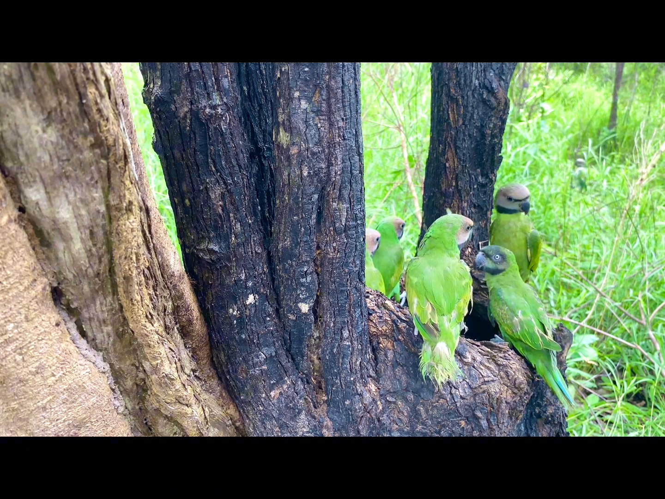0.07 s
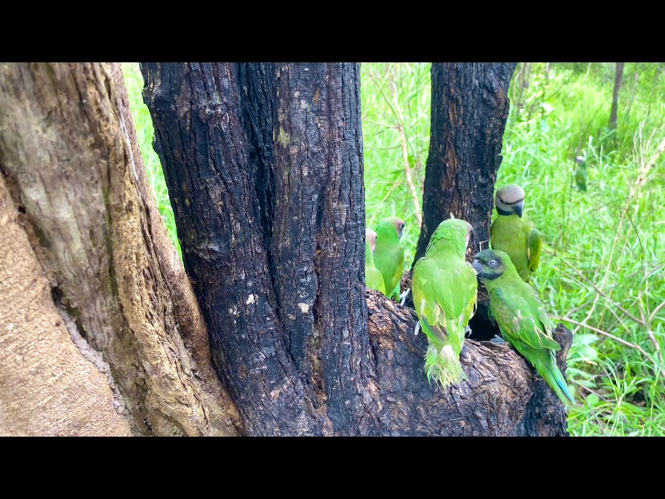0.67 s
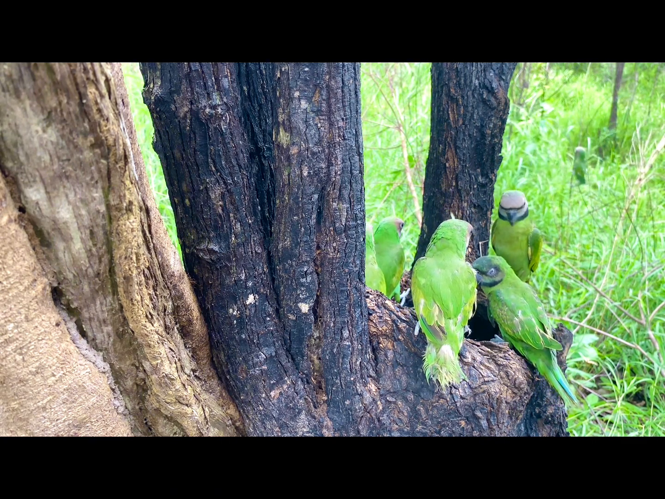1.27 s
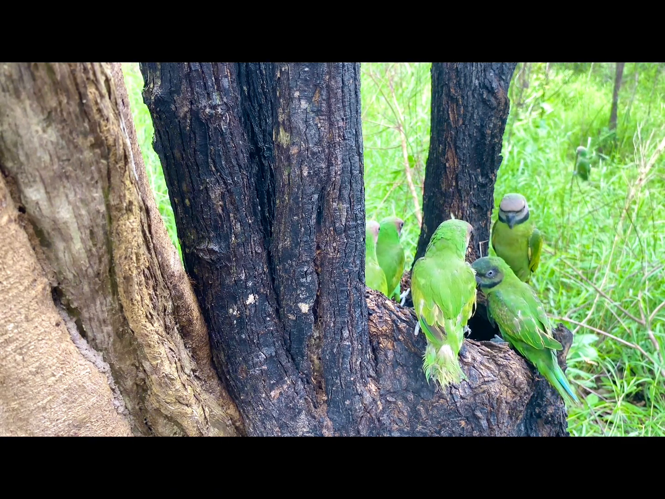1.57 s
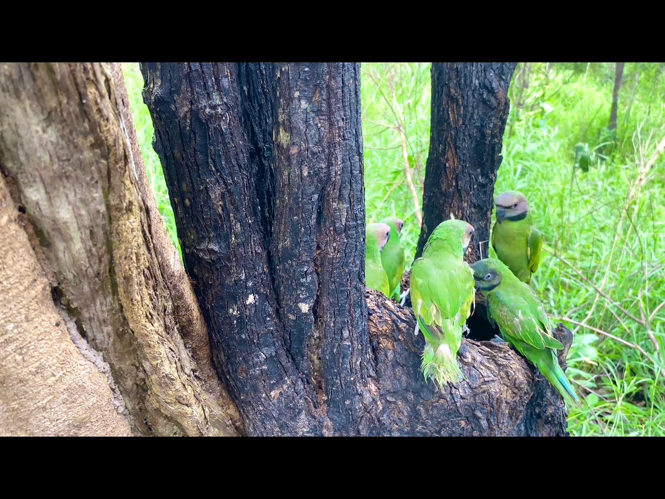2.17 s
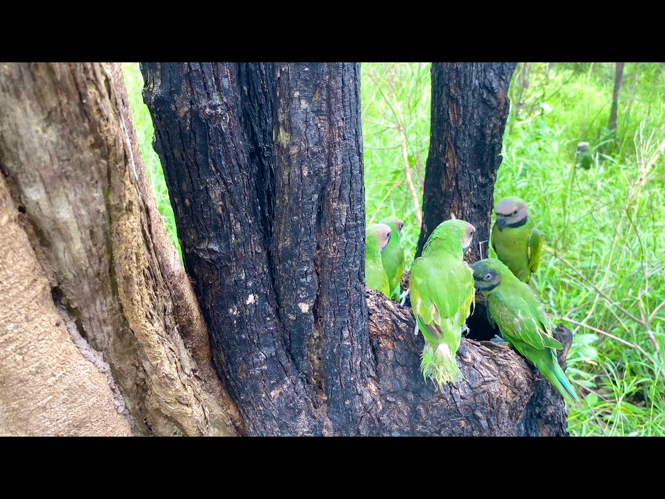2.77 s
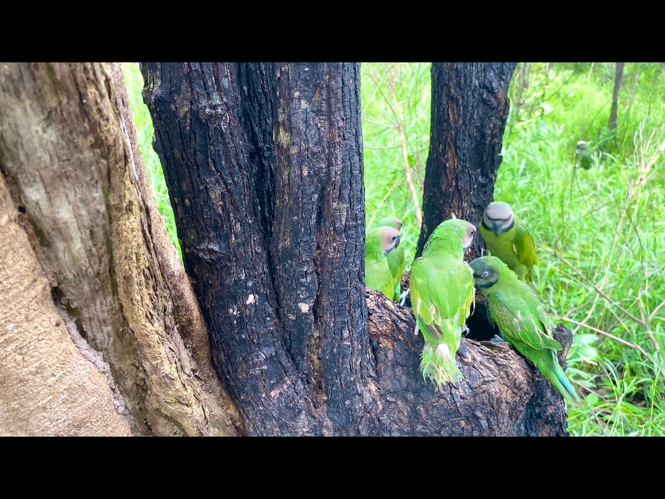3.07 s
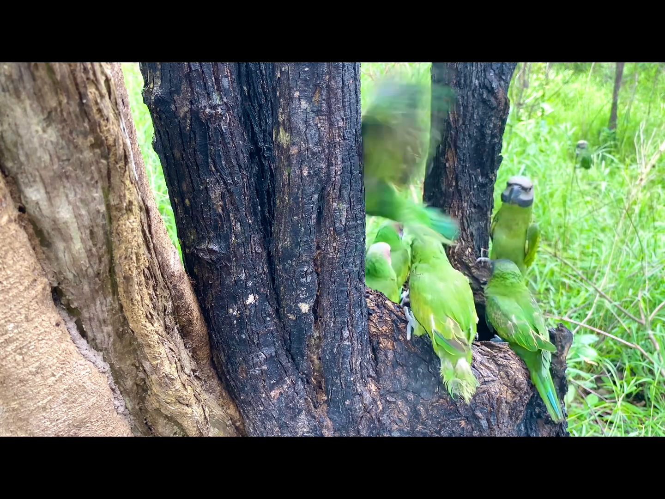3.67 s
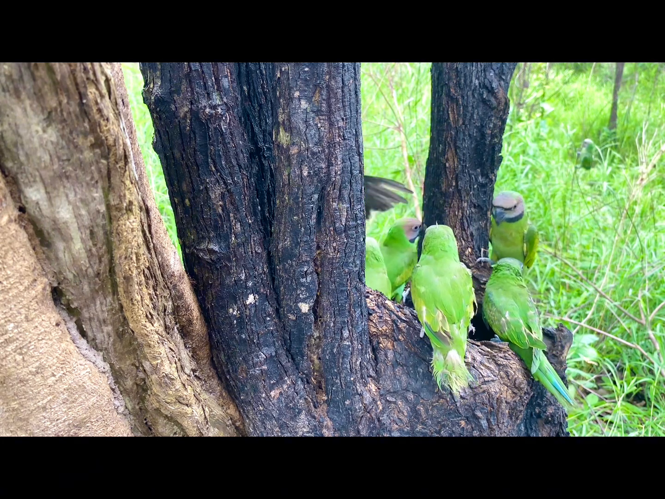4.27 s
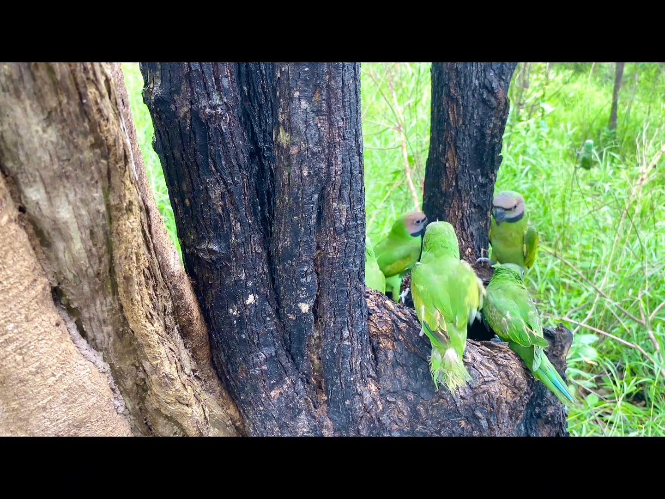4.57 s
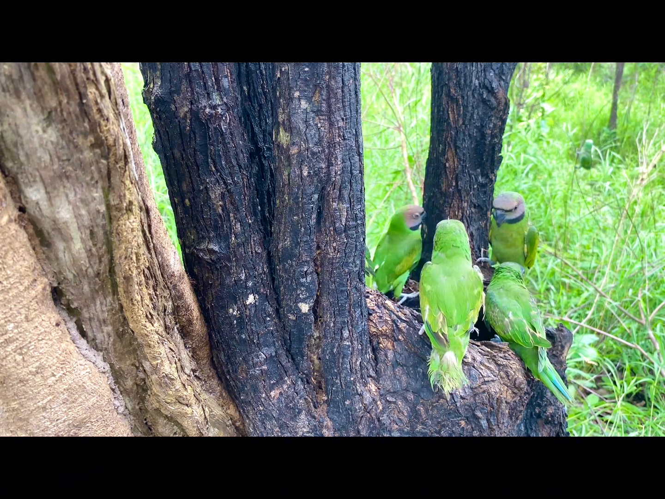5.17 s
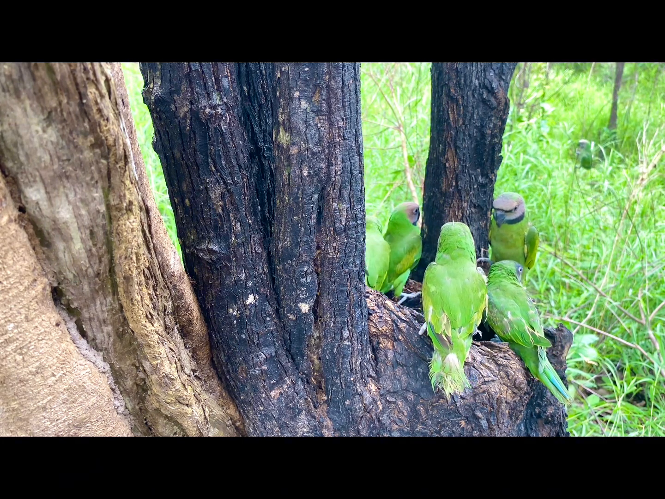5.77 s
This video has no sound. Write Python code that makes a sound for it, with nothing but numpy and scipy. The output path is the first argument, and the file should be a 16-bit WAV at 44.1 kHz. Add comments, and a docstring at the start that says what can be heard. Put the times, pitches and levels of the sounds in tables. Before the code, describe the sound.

Quiet woodland hisses faintly throughout, with a light breeze rumbling on the microphone. A soft parakeet rasp opens, and a distant dove coos faintly until about 2.3 seconds. A small bird gives thin, rising whistles far off near 0.7, 1.9 and 4.8 seconds. At 1.3 seconds a close parakeet gives one short, harsh, piercing screech, by far the loudest sound, with a slight echo from the trees. Claws scrape lightly on bark between 2 and 2.5 seconds. From 3.3 to 3.8 seconds a bird flies close past with about eight quick, clapping, rustling wingbeats and puffs of air. A soft creaky rasp follows at 4.3 seconds, then scattered thin claw ticks. Around 5 seconds a muffled, stuttering churr slides into a wavering, falling whine. A tiny low bird note at 5.5 seconds and a few faint rasps finish by 6 seconds.

```python
"""In quiet woodland, parakeets crowd round a nest hollow. Light air stirs, a dove coos and a small bird
whistles far off. One parakeet screeches close by, claws scratch the bark, another flies in past the
microphone with clapping wings, and soft rasps and a churr follow. The parakeets' voices are source and
filter: pulses from the syrinx excite resonances of windpipe and beak. Wings, claws and wind are
shaped noise, and the trees scatter the nearer sounds."""
import sys
import numpy as np
from scipy import signal
from scipy.fft import rfft, irfft, next_fast_len
from scipy.io import wavfile
from scipy.ndimage import uniform_filter1d, map_coordinates

SR = 44100
rng = np.random.default_rng(int(sys.argv[2]) if len(sys.argv) > 2 else 0)


def int16_out(signal):
    """Quantize to a 16-bit WAV file."""
    q = np.round(np.clip(np.atleast_2d(signal).T, -1, 1) * 32767)
    wavfile.write(sys.argv[1], SR, q.astype(np.int16))


N = 264644
HZ, TIME = np.fft.rfftfreq(N, 1 / SR), np.arange(N) / SR
BAND_LIMIT_HZ = 15950


def amp(db):
    """Amplitude ratio of a level in decibels."""
    return 10 ** (np.asarray(db) / 20)


def unit(x):
    """Normalisation to unit rms."""
    return x / np.sqrt(np.mean(x ** 2) + 1e-20)


def spectrum(points, hz=HZ):
    """Interpolation on a log-frequency axis."""
    f, value = np.transpose(points)
    return np.interp(np.log(hz + 1), np.log(f + 1), value)


def follow(curve, t):
    """Linear interpolation of each column at times t."""
    s, *columns = np.transpose(curve)
    return [np.interp(t, s, c) for c in columns]


def add(mix, s, sound):
    """Superposition of a sound starting at s seconds."""
    part = mix[..., max(round(s * SR), 0):][..., :sound.shape[-1]]
    part += sound[..., :part.shape[-1]]


def wobble(size, rate_hz):
    """Smooth random modulation of unit rms."""
    knots = np.arange(size) * rate_hz / SR
    return unit(map_coordinates(rng.standard_normal(2048), [knots], order=2, mode="wrap"))


def swell(t, middle, length):
    """Raised-cosine envelope of height one."""
    return np.cos(np.pi * np.clip((t - middle) / length, -.5, .5)) ** 2


def stroke(length):
    """Critically damped pulse, peaking at a third of length."""
    u = np.arange(int(4 * length * SR)) / (length * SR / 3)
    return u * np.exp(1 - u)


def resonate(x, modes):
    """Minimum-phase resonances, each a frequency in Hz, bandwidth in Hz and gain in dB."""
    size = next_fast_len(len(x) + 2048)
    f = abs(np.fft.fftfreq(size, 1 / SR))
    gain = sum(amp(db) / (1 + (2 * (f - hz) / width) ** 2) for hz, width, db in modes)
    gain = gain / (1 + (modes[0][0] / 2 / (f + 1)) ** 4) + 1e-5  # bass roll-off
    response = np.exp(np.conj(signal.hilbert(np.log(gain))))
    return np.fft.ifft(np.fft.fft(x, size) * response).real[:len(x)]


def stereo(x, lag_s=0, turn_rad=0):
    """Direction as phase difference: the left channel is delayed, and turned below the top treble."""
    phase = 2 * np.pi * HZ * lag_s + turn_rad / (1 + (HZ / 11500) ** 16)
    return np.array([irfft(rfft(x) * np.exp(-1j * phase), N), x])


# Likeness of the channels. Each row: frequency in Hz, correlation.
COHERENCE = [(40, 0.2975), (130, 0.46), (290, 0.8), (700, 0.15), (3000, 0.16), (7000, 0.11), (9300, 0.67),
             (16000, 0.71)]

def noise(colour):
    """Partially coherent stereo noise of unit rms."""
    left, independent = rfft(rng.standard_normal((2, N)))
    same = spectrum(COHERENCE)
    right = same * left + np.sqrt(1 - same ** 2) * independent
    return unit(irfft(np.array([left, right]) * amp(spectrum(colour)), N))


# Background spectrum. Each row: frequency in Hz, relative density in dB.
WOOD_SPECTRUM = [(25, -29), (70, -19), (120, -2.5), (184, -13.5), (300, -5.5), (400, -9), (900, -9.5),
                 (2500, -17), (5300, -19), (9200, -28), (12300, -29), (15000, -45.5), (16000, -61.5)]

def woodland(level_db=-55, flutter_db=0.93):
    """Leaves and distant sounds sum to nearly steady noise."""
    return amp(level_db + flutter_db * wobble(N, 25)) * noise(WOOD_SPECTRUM)


# Light breeze. Each row: time in seconds, level in dB.
BREEZE = [(0, -70), (.85, -63), (1.55, -69), (1.75, -57), (2.9, -54), (3.3, -53), (4.0, -57.5), (6, -52.5)]
# Gusts. Each row: centre and duration in seconds, level in dB.
GUSTS = [(0.171, 0.042, -48), (0.369, 0.25, -48.5), (3.325, 0.034, -43.5), (4.42, 0.41, -56),
         (4.916, 0.074, -49), (5.238, 0.27, -49.5), (5.856, 0.17, -52)]
# Wind and its deeper buffeting. Each row: frequency in Hz, relative density in dB.
WIND_SPECTRUM = [(15, -23), (30, -19), (60, 1), (95, 0), (160, -10.5), (300, -21), (700, -56)]
BUFFET_SPECTRUM = [(15, -5), (45, 1), (75, -4.5), (130, -28), (400, -55)]

def wind(lumps_db=2):
    """Turbulent pressure on the microphone: the stronger the flow, the greater its share of deep bass."""
    breeze_db, = follow(BREEZE, TIME)
    breeze = amp(breeze_db) * unit(amp(lumps_db * wobble(N, 14)))
    breeze += sum(amp(db) * swell(TIME, s, length) for s, length, db in GUSTS)
    flow = np.hypot(breeze, wing_wake())  # powers add
    buffet = flow * np.sqrt(flow / flow.max()) * noise(BUFFET_SPECTRUM)
    return flow * noise(WIND_SPECTRUM) + buffet


def far_note(hz, waver=0.016, fading_db=3):
    """Amplitude fading: a nearly pure tone comes and goes through the leaves."""
    cycles = np.cumsum(hz * (1 + waver * wobble(len(hz), hz[0] / 20))) / SR
    fading = amp(fading_db * wobble(len(hz), hz[0] / 40))
    return unit(fading * np.sin(2 * np.pi * cycles) * signal.windows.tukey(len(hz), .6))


# Coos. Each row: start and duration in seconds, level in dB, mid-note pitch in Hz.
COOS = [(0.033, 0.091, -72, 320), (0.336, 0.19, -59.5, 326), (0.678, 0.18, -60, 318), (1, 0.21, -62, 311),
        (1.715, 0.153, -64, 292), (2.077, 0.25, -64, 302)]

def dove(sag=0.114):
    """Parabolic frequency glide: each distant coo sags in the middle."""
    out = np.zeros(N)
    for s, length, db, hz in COOS:
        u = np.linspace(-1, 1, int(length * SR))
        add(out, s, amp(db) * far_note(hz * (1 + sag * u ** 2)))
    return stereo(out)


# Creaking rasps. Each row: start and duration in seconds, level in dB, pulse rate in Hz,
# low resonance and its bandwidth in Hz, high resonance in Hz, its gain in dB.
RASPS = [(0.037, 0.35, -58, 87, 1260, 500, 2600, -2.5), (4.288, 0.33, -59, 153, 1340, 259, 1890, -13.5),
         (5.584, 0.034, -52, 130, 823, 870, 2800, -10), (5.628, 0.214, -56, 70, 515, 500, 1460, -10),
         (5.802, 0.081, -61, 76, 600, 504, 2300, -5)]

def rasps(high_width_hz=1200, unevenness=0.14, breathiness=0.28):
    """Pulsed excitation: slow, uneven puffs ring two throat resonances."""
    out = np.zeros(N)
    for s, length, db, rate, low_hz, width_hz, high_hz, high_db in RASPS:
        size = int(length * SR)
        cycles = np.cumsum(rate * (1 + unevenness * wobble(size, 60))) / SR
        puffs = (breathiness + np.exp(-(cycles % 1) / .22)) * rng.standard_normal(size)
        note = resonate(puffs, [(low_hz, width_hz, 0), (high_hz, high_width_hz, high_db)])
        add(out, s, amp(db) * unit(note) * signal.windows.tukey(size, .2))
    return stereo(out, lag_s=-0.00036)


# Whistles. Each row: start and duration in seconds, level in dB, first and last pitch in Hz.
WHISTLES = [(.66, .135, -67, 3800, 5500), (1.86, .12, -65, 3950, 5600), (4.81, .07, -69, 4100, 5400)]

def small_bird():
    """Linear frequency sweep: each distant whistle climbs."""
    out = np.zeros(N)
    for s, length, db, first_hz, last_hz in WHISTLES:
        add(out, s, amp(db) * far_note(np.linspace(first_hz, last_hz, int(length * SR))))
    return stereo(out)


def syrinx(hz, rough, jitter=0.07, doubling=0.49):
    """Membrane oscillation: roughness brings jitter, period doubling and puffs of noise."""
    cycles = np.cumsum(hz * (1 + jitter * rough * wobble(len(hz), 900))) / SR
    pulses = unit(sum(np.cos(2 * np.pi * k * cycles) * (k * hz < BAND_LIMIT_HZ) for k in range(1, 24)))
    pulses *= 1 + doubling * rough * np.cos(np.pi * cycles)
    puffs = unit((1 + np.cos(2 * np.pi * cycles)) * rng.standard_normal(len(hz)))
    return (1 - rough) * pulses + rough * puffs


# Contours of the screech. Each row: time in seconds, then respectively open-throat pitch in Hz,
# effort in dB, or roughness from 0 to 1.
SCREECH_PITCH = [(1.333, 600), (1.345, 690), (1.365, 967), (1.38, 971), (1.436, 962), (1.45, 950),
                 (1.473, 1030), (1.483, 970), (1.494, 700)]
SCREECH_EFFORT = [(1.333, -45), (1.341, -26.5), (1.352, -17.3), (1.361, -17.8), (1.367, -11.8),
                  (1.392, -15.8), (1.416, -16), (1.432, -18.3), (1.483, -21.3), (1.494, -48)]
SCREECH_ROUGHNESS = [(1.333, .6), (1.36, .45), (1.367, .05), (1.42, .06), (1.432, .48), (1.452, .3),
                     (1.465, .52), (1.494, .65)]
# Throat constrictions. Each row: centre and duration in seconds, depth from 0 to 1.
PINCHES = [(1.345, .045, .8), (1.398, .016, .75), (1.417, .022, 1), (1.436, .03, .55), (1.451, .024, .9),
           (1.47, .03, .4)]
# Resonances of windpipe and beak. Each row: frequency and bandwidth in Hz, gain in dB.
OPEN_THROAT = [(980, 1100, -23.5), (1910, 740, -19), (3060, 860, -14.5), (3960, 680, -4), (4890, 460, 1),
               (7930, 400, -19.5), (8660, 400, -11.5), (9930, 980, -25), (12300, 1900, -32),
               (15760, 1100, -40)]
PINCHED_THROAT = [(1066, 170, -24.5), (1370, 178, 0.5), (1933, 570, -0.5), (2666, 370, -18.5),
                  (3630, 200, 1.5), (4700, 250, -30), (5350, 470, -4), (6443, 210, -3), (6970, 400, -11.5),
                  (8240, 500, -17.5), (9670, 400, -21), (10200, 484, -19), (12300, 1500, -31),
                  (15400, 470, -39.5)]
BEAK_HISS = [(4500, 4000, 3), (10320, 3500, -3), (15400, 1500, -18)]
# Stereo balance. Each row: frequency in Hz, left minus right in dB.
SCREECH_BALANCE = [(900, 0.5), (1900, 3), (2800, -2.5), (3750, -3), (4800, 3.5), (5700, 7.5), (6500, 5),
                   (10000, 1.5)]

def screech(fundamental_db=-11.5, hiss_db=-25, tremble=0.00068, pinch_drop=0.044):
    """Source and filter: a note, harsh at both ends, flips register as the throat pinches."""
    start, end = SCREECH_PITCH[0][0], SCREECH_PITCH[-1][0]
    t = np.arange(start, end, 1 / SR)
    hz, = follow(SCREECH_PITCH, t)
    effort_db, = follow(SCREECH_EFFORT, t)
    rough, = follow(SCREECH_ROUGHNESS, t)
    pinch = np.minimum(sum(depth * swell(t, s, length) for s, length, depth in PINCHES), 1)
    hz = hz * (1 - pinch_drop * pinch) * (1 + tremble * wobble(len(t), 400))
    drive = syrinx(hz, rough)
    voice = resonate(drive * (1 - pinch), OPEN_THROAT) + resonate(drive * pinch, PINCHED_THROAT)
    voice /= np.sqrt(abs(uniform_filter1d(voice ** 2, size=300)) + 1e-12)  # both registers equally loud
    # the membranes' basic swing keeps its pitch even when the overtones break up
    fundamental = np.sin(2 * np.pi * np.cumsum(hz) / SR)
    fundamental *= 1 + rough * (1 + 1.4 * wobble(len(t), 304))
    hiss = unit(resonate(rng.standard_normal(len(t)), BEAK_HISS)) * (.5 + rough + pinch)
    voice += amp(fundamental_db) * fundamental + amp(hiss_db) * hiss
    out = np.zeros(N)
    add(out, start, voice * amp(effort_db) * signal.windows.tukey(len(t), .02))
    balance = amp(np.outer([.5, -.5], spectrum(SCREECH_BALANCE)))
    return irfft(rfft(stereo(out, turn_rad=1.0)) * balance, N)


# Claw contacts. Each row: start in seconds, level in dB.
SCRAPES = [(1.961, -51.5), (1.988, -55.5), (2.004, -62), (2.113, -54), (2.422, -53.5), (2.448, -52.5),
           (2.471, -54.5)]
TICKS = [(4.6069, -59), (4.7107, -54.5), (4.772, -56), (5.4095, -49), (5.437, -54), (5.46, -56),
         (5.5124, -54), (5.5383, -57), (5.8312, -46)]

def claws(scrape_s=0.017, tick_s=0.0037):
    """Friction and impact on bark give gritty scrapes and thin ticks."""
    scrapes, ticks = np.zeros(N), np.zeros(N)
    for s, db in SCRAPES:
        add(scrapes, s, amp(db) * stroke(scrape_s))
    for s, db in TICKS:
        add(ticks, s, amp(db) * stroke(tick_s))
    grit = noise([(1000, -14.5), (2800, 1), (7500, 0), (10000, -14), (16000, -21)])
    snap = noise([(2000, -11), (6000, -3), (11000, 7), (16000, -3.5)])
    return scrapes * grit + ticks * snap


def nearness_db(t, arrive_s=3.392, leave_s=3.6, rise_db_per_s=113, fall_db_per_s=48):
    """Level falls with distance: the flying bird relative to its closest moment."""
    return -rise_db_per_s * np.maximum(arrive_s - t, 0) - fall_db_per_s * np.maximum(t - leave_s, 0)


# Wingbeats. Each row: start and duration in seconds, feather and thump levels in dB,
# thump frequency in Hz, wake level in dB.
WINGBEATS = [(3.302, .015, -46, -58, 500, -58), (3.346, 0.013, -43.5, -42.5, 1100, -53),
             (3.385, .012, -33, -36, 840, -28), (3.473, 0.013, -39.5, -34, 740, -40.5),
             (3.552, .016, -30.5, -31.5, 260, -44), (3.623, .013, -28, -29.5, 604, -53),
             (3.686, 0.0093, -44.5, -34, 470, -60), (3.778, 0.016, -33, -54, 476, -56)]
# Wing-tip snaps. Each row: start and duration in seconds, level in dB.
TIP_SNAPS = [(3.487, 0.0037, -30.5), (3.568, .008, -34.5), (3.761, .005, -43)]
# Feather rattle and air rushing through feathers. Each row: frequency in Hz, relative density in dB.
RATTLE_SPECTRUM = [(300, 6.5), (900, 1.5), (2000, 1), (3500, -3.5), (7000, -5.5), (11000, -4), (16000, -12)]
RUSH_SPECTRUM = [(88, -36), (150, -13), (716, -20), (998, -29.5), (1360, -20), (1760, -27), (7320, -35.5),
                 (9260, -40), (11000, -31), (16000, -41)]

def wings(rush_db=-44.5, grain_db=2, upstroke_db=-45, upstroke_lag_s=0.057, upstroke_hz=674):
    """Air displacement: each beat and its upstroke shove a puff of air and rattle the stiff feathers."""
    rattle, thumps = np.zeros(N), np.zeros(N)
    strokes = [beat[:-1] for beat in WINGBEATS]
    for beat_s, *_ in WINGBEATS:
        s = beat_s + upstroke_lag_s
        db = upstroke_db + nearness_db(s)
        strokes.append((s, 0.016, db, db, upstroke_hz))
    for s, length, feather_db, thump_db, thump_hz in strokes:
        shape = stroke(length)
        add(rattle, s, amp(feather_db) * shape)
        band = resonate(rng.standard_normal(8192), [(thump_hz, 0.82 * thump_hz, 0)])
        puff = unit(band[-len(shape):] * shape)
        add(thumps, s, amp(thump_db) * puff * np.sqrt(np.mean(shape ** 2)))
    for s, length, db in TIP_SNAPS:
        add(rattle, s, amp(db) * stroke(length))
    grain = unit(amp(grain_db * wobble(N, 900)))
    rush = amp(rush_db + nearness_db(TIME)) * noise(RUSH_SPECTRUM)
    return grain * (rattle * noise(RATTLE_SPECTRUM) + rush) + stereo(thumps, lag_s=-0.000037)


def wing_wake(wake_db=-42, balance_db=-5, lag_s=0.013, linger_s=0.024):
    """Envelope of the wake: airflow is slower than sound, so each beat's draught arrives late."""
    wake = amp(wake_db + nearness_db(TIME))
    for s, *_, db in WINGBEATS:
        add(wake, s + lag_s, amp(db) * stroke(linger_s))
    return wake * amp(np.outer([.5, -.5], balance_db))


# Resonances with the beak shut. Each row: frequency and bandwidth in Hz, gain in dB.
SHUT_BEAK = [(653, 540, 2.5), (1410, 120, -5.5), (1850, 310, -15), (3120, 690, -12.5)]

def shut_note(hz, rough, taper):
    """Formant filtering: the shut beak muffles a note of the syrinx."""
    note = syrinx(hz, rough) * signal.windows.tukey(len(hz), taper)
    return unit(resonate(np.pad(note, (0, 200)), SHUT_BEAK))


# Churr syllables. Each row: centre in seconds, level in dB.
SYLLABLES = [(4.979, -48.5), (4.9955, -42.5), (5.0155, -44), (5.037, -45.5), (5.061, -45.5), (5.085, -45.5),
             (5.107, -44.5), (5.131, -46.5), (5.156, -48), (5.181, -50), (5.206, -50), (5.234, -50.5)]
# Their changing shape. Each row: time and duration in seconds, pitch in Hz, roughness from 0 to 1.
SYLLABLE_DRIFT = [(4.99, 0.0078, 705, 0.65), (5.06, 0.02, 603, 0.65), (5.14, 0.02, 570, 0.72),
                  (5.24, 0.022, 670, 0.3)]
# Closing whine. Each row: time in seconds, pitch in Hz.
WHINE = [(5.25, 871), (5.268, 705), (5.283, 860), (5.294, 628), (5.302, 787), (5.318, 636), (5.335, 448)]

def churr(scoop=0.22, rise=0.72, whine_db=-45):
    """Frequency modulation: scooped syllables lengthen and merge into a wavering, falling whine."""
    out = np.zeros(N)
    for s, db in SYLLABLES:
        length, hz, rough = follow(SYLLABLE_DRIFT, s)
        u = np.linspace(-1, 1, int(length * SR))
        pitch = hz * (1 + np.where(u < 0, scoop, rise) * u ** 2)
        add(out, s - length / 2, amp(db) * shut_note(pitch, rough, taper=0.52))
    pitch, = follow(WHINE, np.arange(WHINE[0][0], WHINE[-1][0], 1 / SR))
    add(out, WHINE[0][0], amp(whine_db) * shut_note(pitch, rough=0.19, taper=0.27))
    return out


def murmur(start_s=5.49, length_s=0.107, hz=540, level_db=-57, arch=0.21, overtone_db=-18):
    """A fundamental and weak second harmonic arch and sink in pitch."""
    u = np.linspace(-.8, 1.2, int(length_s * SR))
    pitch = hz * (1 - arch * u ** 2 + 0.019 * wobble(len(u), 142))
    phase = 2 * np.pi * np.cumsum(pitch) / SR
    note = (np.sin(phase) + amp(overtone_db) * np.sin(2 * phase)) * signal.windows.tukey(len(u), .5)
    out = np.zeros(N)
    add(out, start_s, amp(level_db) * unit(note))
    return out


# The wood's echo. Each row: frequency in Hz, then respectively relative level in dB,
# or seconds to decay by 60 dB.
ECHO_SPECTRUM = [(300, -22), (1900, -0.5), (2700, -4), (3700, 7.5), (4800, -3), (7000, 6), (15000, -31)]
ECHO_T60 = [(200, .6), (2000, 0.9), (5000, 1), (12000, 0.17)]

def trees(x, near_db=-31, near_t60=0.147, far_db=-38):
    """Reverberation: quick scatter from the nearest trunks, then a faint tail from the wood."""
    hz, t, bands = signal.stft(rng.standard_normal((2, SR)), SR, nperseg=256)
    decay_db = spectrum(ECHO_SPECTRUM, hz)[:, None] - 60 * t / spectrum(ECHO_T60, hz)[:, None]
    tail = signal.istft(bands * amp(decay_db), SR, nperseg=256)[1][:, :SR]
    near = rng.standard_normal((2, SR)) * amp(-60 * TIME[:SR] / near_t60)
    echo = amp(near_db) * near / np.linalg.norm(near[0]) + amp(far_db) * tail / np.linalg.norm(tail[0])
    return x + signal.fftconvolve(x, echo, axes=1)[:, :N]


def scene():
    """Superposition of parakeets among the trees, distant birds, leaves and wind."""
    parakeets = screech() + stereo(churr() + murmur(), lag_s=-0.00037) + rasps() + wings() + claws()
    return trees(parakeets) + dove() + small_bird() + woodland() + wind()


# Microphone balance. Each row: frequency in Hz, left minus right in dB.
MIC_BALANCE = [(60, 1.5), (400, 3.5), (900, 3), (1900, 3.5), (2700, 7.5), (3800, 11.5), (4800, 13.5),
               (5800, 21), (6600, 9.5), (8600, 8.5), (9700, -0.5), (16000, 0)]

def record(dry, left_lag_s=0.000267):
    """Time and level differences make the left channel later and brighter; a low-pass limits both."""
    tilt = amp(spectrum(MIC_BALANCE))
    left = tilt * np.exp(-2j * np.pi * HZ * left_lag_s)
    response = np.array([left, np.ones(len(HZ))]) * np.sqrt(2 / (1 + tilt ** 2))  # constant power
    heard = irfft(rfft(dry) * response, N)
    low_pass = signal.firwin(511, BAND_LIMIT_HZ, window=("kaiser", 9), fs=SR)
    return signal.oaconvolve(heard, low_pass[None], "same")


dry = scene()
out = record(dry)
int16_out(out)
```